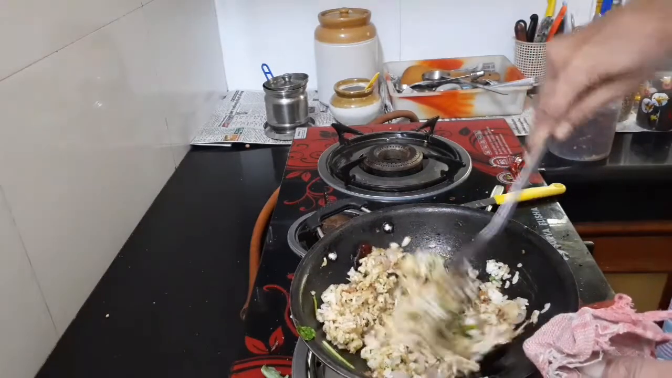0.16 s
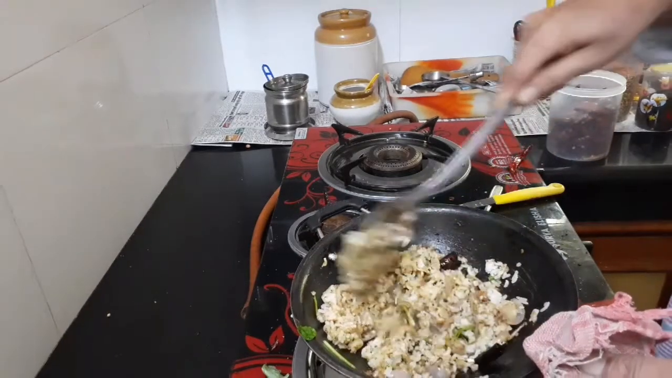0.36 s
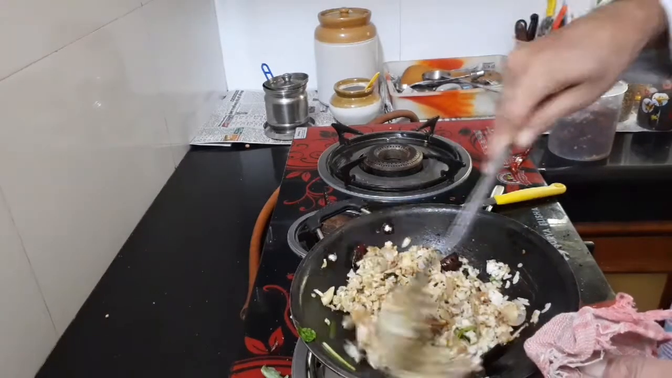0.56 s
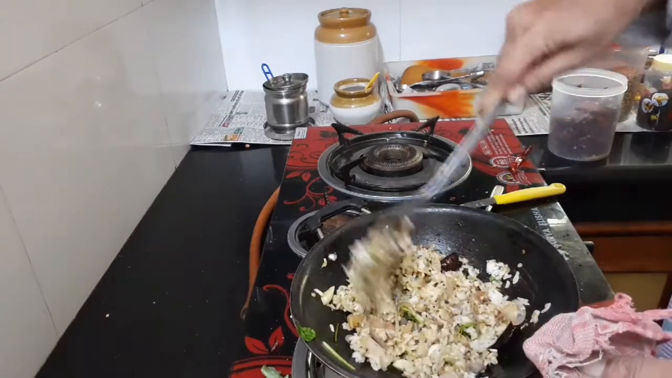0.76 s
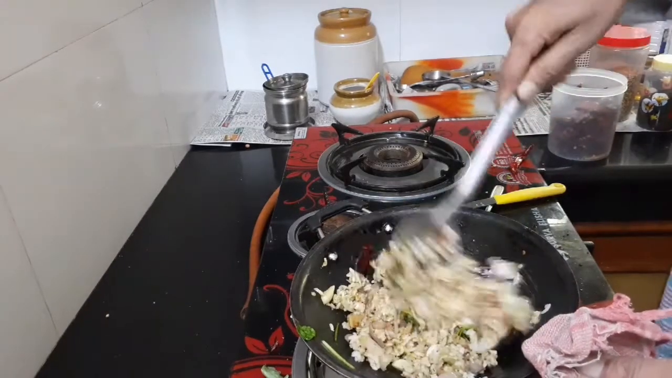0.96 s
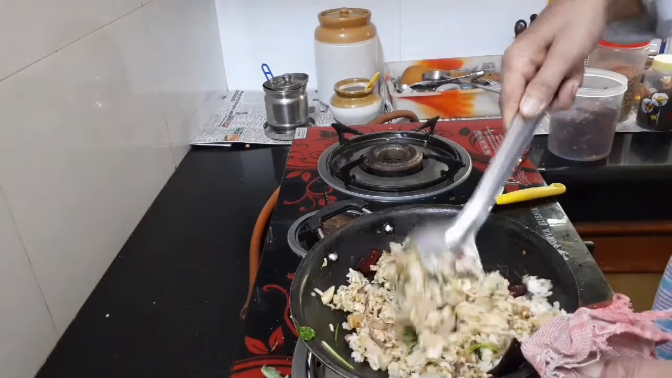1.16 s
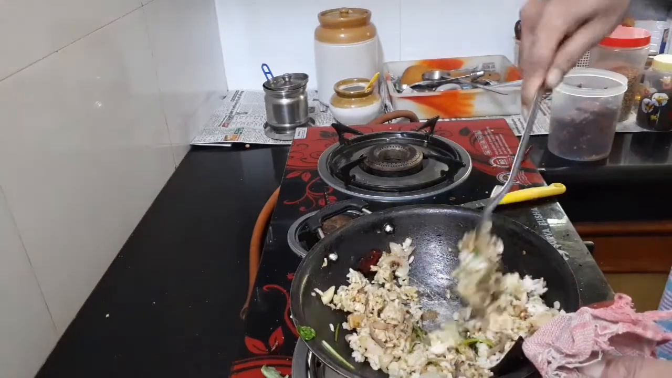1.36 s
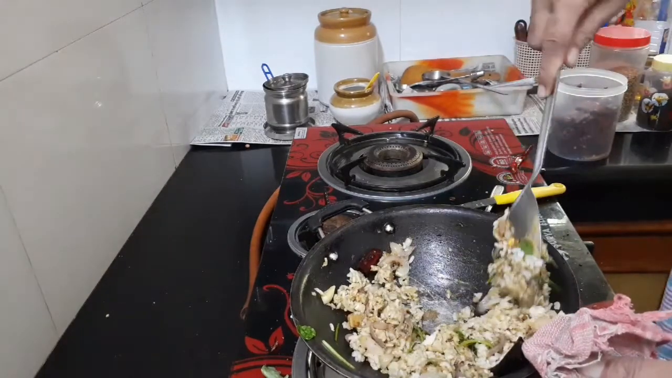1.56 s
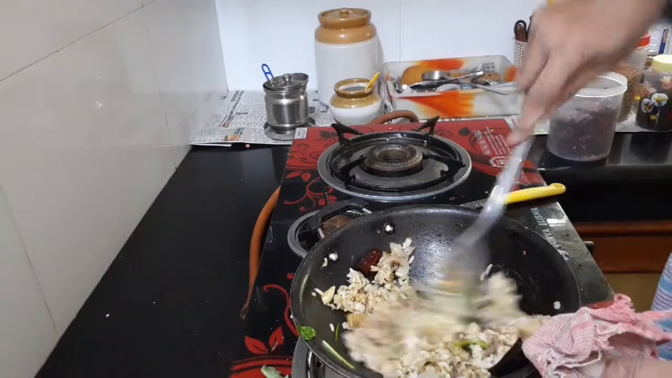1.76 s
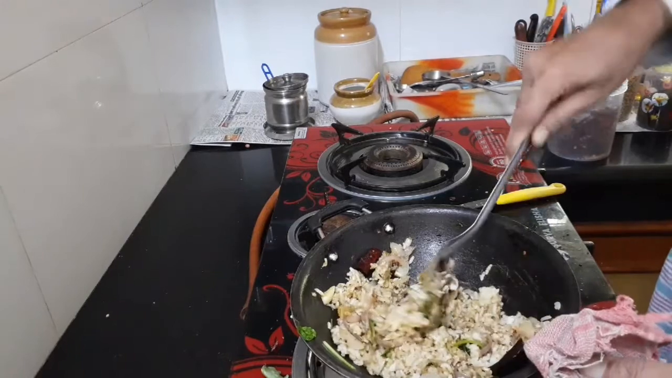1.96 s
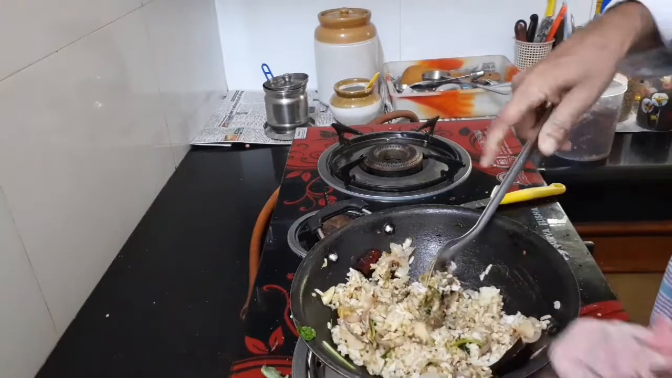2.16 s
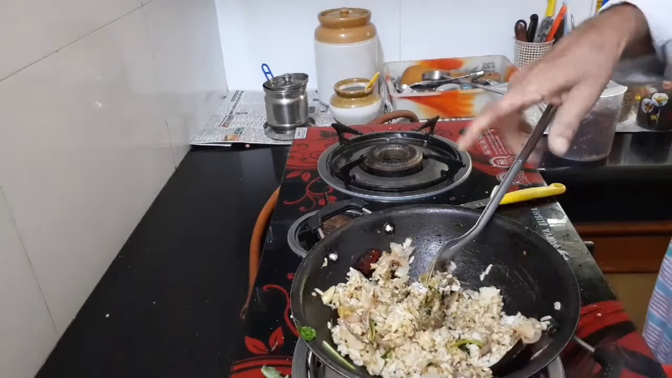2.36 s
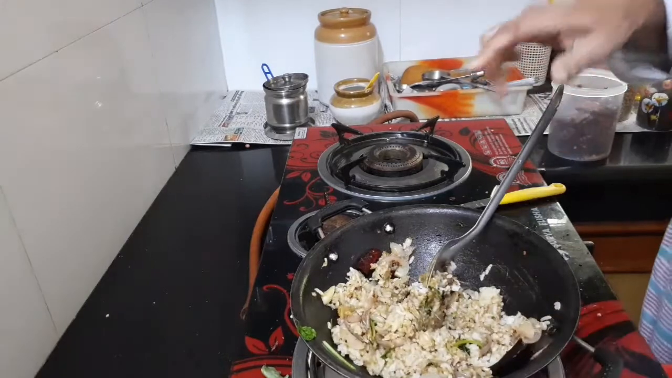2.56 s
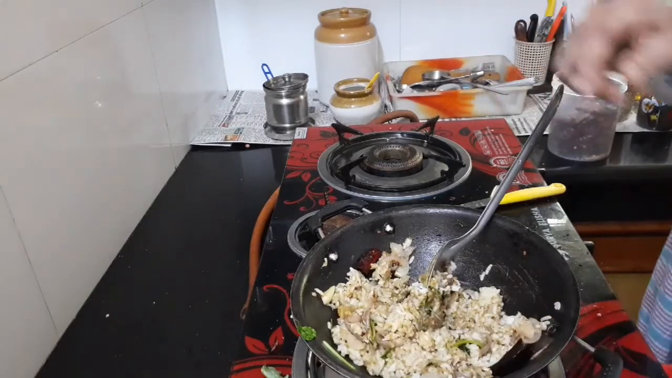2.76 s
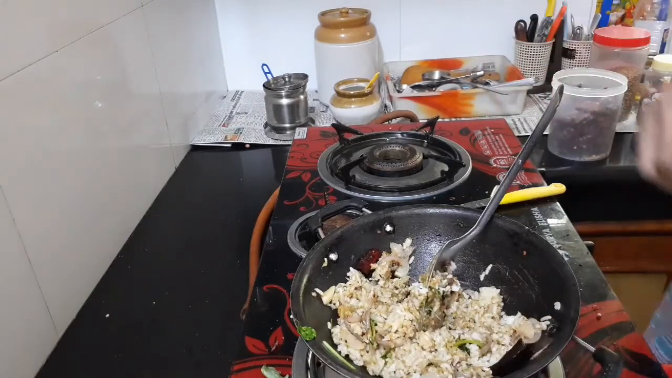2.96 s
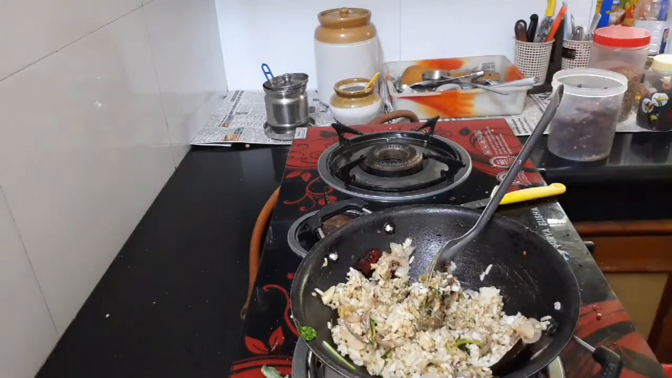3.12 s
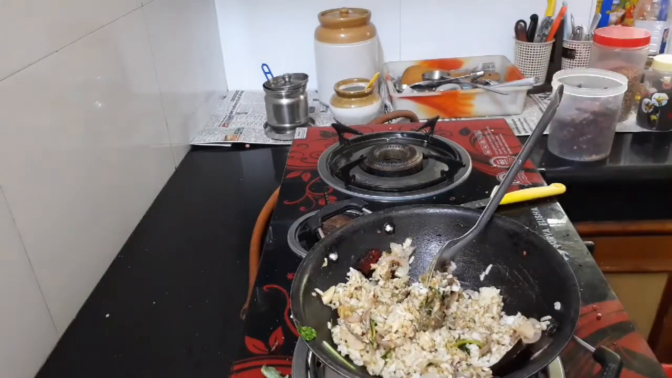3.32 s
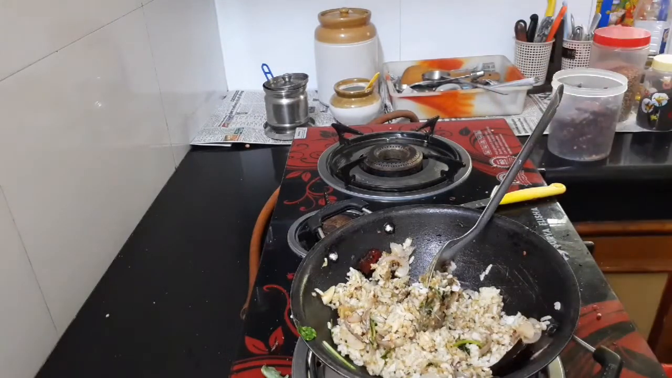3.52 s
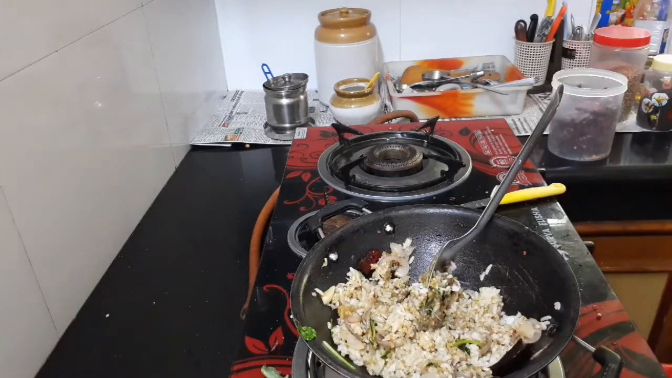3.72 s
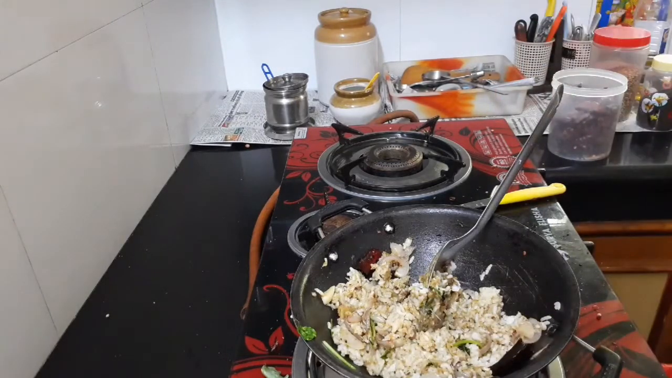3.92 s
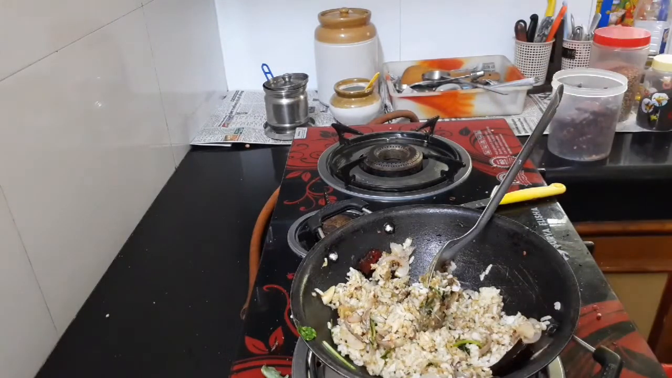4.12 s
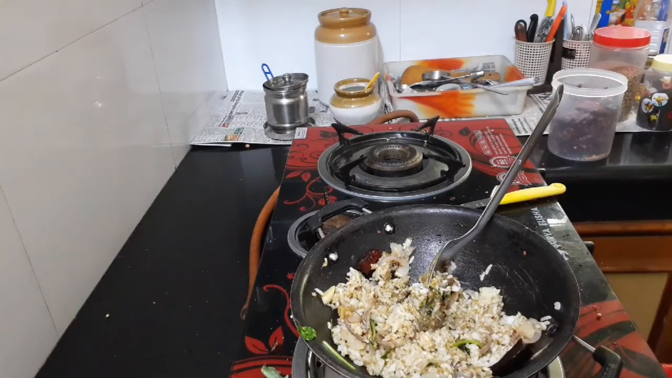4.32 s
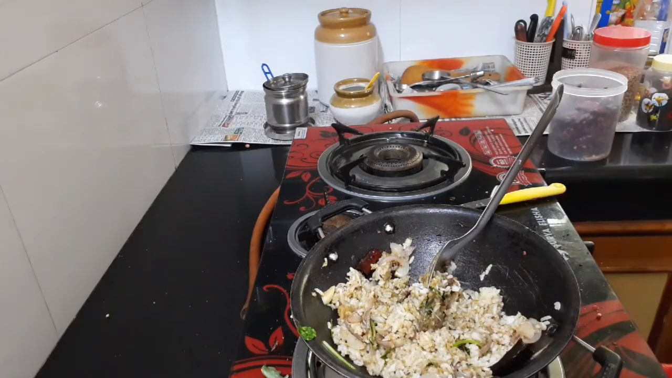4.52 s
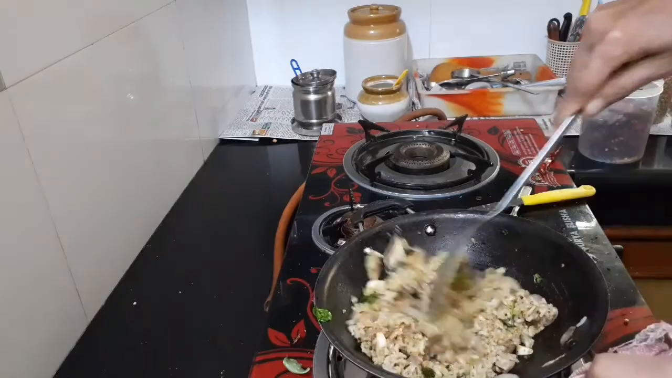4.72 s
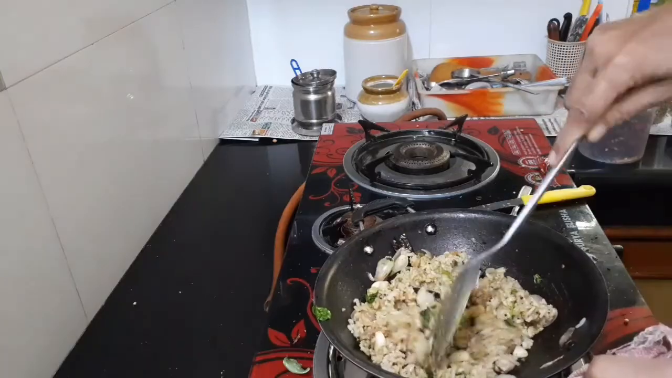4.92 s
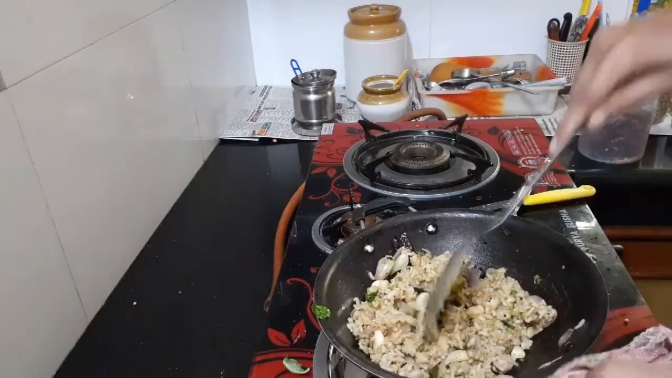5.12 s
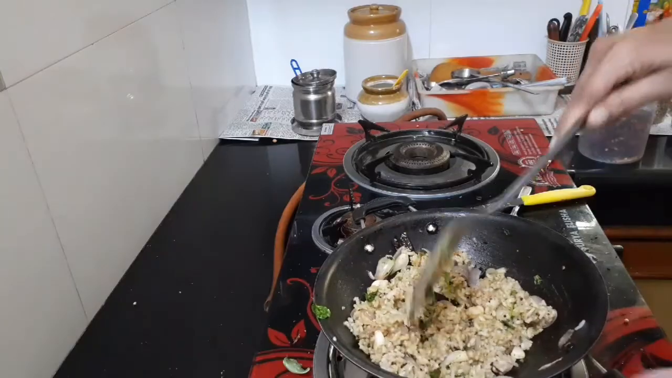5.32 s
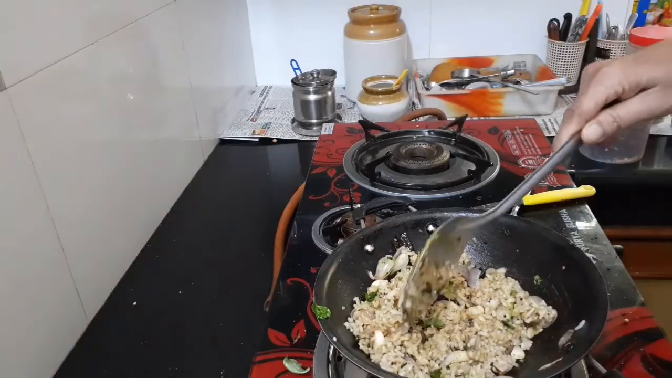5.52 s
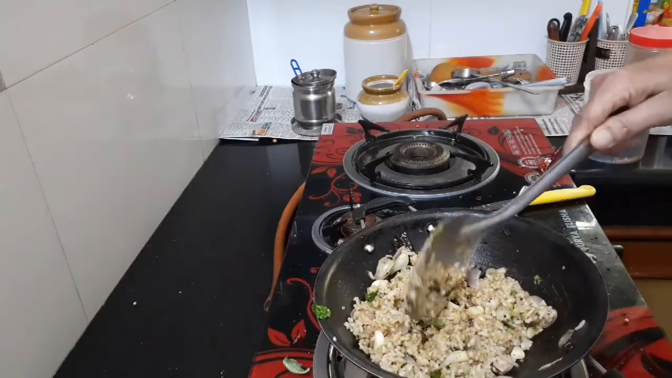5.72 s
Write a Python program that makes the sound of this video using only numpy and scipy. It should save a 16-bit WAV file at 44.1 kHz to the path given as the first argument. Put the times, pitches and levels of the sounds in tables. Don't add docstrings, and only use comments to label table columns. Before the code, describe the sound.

A nearby stereo microphone pair hears rice being fried in a home kitchen. From the start, fine sizzle and soft low rumble of air and burner sit under a faint steady fan hum. At about 0.55 to 0.7 seconds a metal ladle scrapes brightly and knocks the pan, with a thin squeal. Around 0.9 it taps again, and near 1.1 a short low groan rubs out of the pan. From 1.6 to 2.3 come quick clanks, scrapes, grainy rustles and dull thuds. The ladle then rests; the sizzle livens, with scattered sharp pops and ticks. From 3.6 everything fades steadily, reaching silence near 4.7. Stirring cuts back in abruptly, and at about 4.98 the ladle strikes bare metal with a loud, bright, short-ringing clang. Further knocks and scrapes follow at 5.1, 5.2 and 5.35, leaving sizzle, a few pops and low rumble until the end near 5.9.

```python
import sys
import numpy as np
from scipy import signal
from scipy.fft import rfft, irfft
from scipy.io import wavfile
from scipy.ndimage import uniform_filter1d

SR = 44100
rng = np.random.default_rng(int(sys.argv[2]) if len(sys.argv) > 2 else 0)


def natural_amplitude(level_db):
    exponent = np.asarray(level_db, float) / 20
    return 10 ** exponent


def log_audio(samples):
    frames = np.atleast_2d(samples).T
    limited = np.clip(frames, -1, 1)
    pcm = np.round(limited * 32767).astype(np.int16)
    wavfile.write(sys.argv[1], SR, pcm)


N = 259308

# (peak time [s], level [dB], build-up [s], let-go [s])
SHOVES = [(.016, -45.5, 0.11, 0.074), (.575, -35, 0.0062, 0.082), (.61, -37.5, 0.021, 0.21),
          (.7, -39.5, 0.19, 0.17), (.905, -36, 0.009, 0.061), (.94, -48, 0.063, 0.092),
          (1.09, -45, 0.18, 0.032), (1.19, -42.5, 0.19, 0.16), (1.55, -44.5, 0.1, 0.045),
          (1.59, -39, 0.0077, 0.39), (1.725, -41.5, 0.012, 0.12), (1.764, -36.5, 0.005, 0.22),
          (1.85, -42.5, 0.13, 0.065), (1.965, -37, 0.015, 0.072), (1.985, -40, 0.054, 0.31),
          (2.08, -41.5, 0.0053, 0.2), (2.172, -42, 0.0089, 0.15), (2.21, -37, 0.092, 0.051),
          (2.245, -50, 0.053, 0.02), (.84, -41, .006, 0.37), (1.166, -48, .01, .1),
          (1.36, -52, 0.035, 0.17), (2.293, -38, 0.0068, 0.23), (4.702, -39.5, 0.04, 0.18),
          (4.944, -39, 0.0089, 0.14), (5.07, -32.5, 0.11, 0.054), (5.154, -37.5, 0.067, 0.031),
          (5.22, -48, .1, 0.34), (5.358, -36.5, 0.027, 0.23)]
# (peak time [s], rice rustle [dB], steel scrape [dB], build-up [s], let-go [s])
SWEEPS = [(.2, -51, -49, 0.19, 0.26), (.554, -45, -37, .005, 0.4), (.603, -39, -27, 0.063, 0.079),
          (.627, -44, -36.5, 0.065, 0.087), (.7, -51, -55, 0.19, 0.14), (.9, -63, -69, .25, 0.079),
          (.97, -44.5, -47, 0.18, 0.092), (1.09, -50.5, -47.5, 0.53, 0.25), (1.59, -52, -56, 0.019, 0.19),
          (1.75, -61.5, -53.5, 1, .1), (1.764, -46, -38.5, 0.002, 0.18), (1.783, -39, -34.5, 0.026, 0.11),
          (1.8, -46, -41.5, 0.074, 0.27), (2., -57.5, -52, 0.14, 0.62), (2.085, -61, -65, .015, .08),
          (2.18, -53, -53, 0.027, 0.18), (4.708, -48, -46.5, 0.024, 0.22), (4.75, -49.5, -47, 0.079, 0.26),
          (4.96, -48.5, -43, 0.034, 0.013), (5.12, -57, -76, 0.19, 1), (5.2, -45, -45, 0.051, 0.08),
          (5.356, -58, -48, 0.016, .02), (5.45, -61, -59, 1, .4), (5.8, -55.5, -59, 1, 0.34)]
SPAN_DB = 27.5
STEEL_QUICKER = 1.2
DRAG_DB, DRAG_PUSH_DB = -62, -75.5
LAID_DOWN_S, FADE_FROM_S, CUT_S, CLANG_S = 2.52, 3.6, 4.702, 4.9765

# (frequency [Hz], level [dB], t60 [s])
PAN = [(286.3, -7, 0.12), (352, -3, 0.2), (420, 5.5, 0.19), (489.4, -6, 0.19), (514.4, 2.5, 0.1),
       (598, 2, 0.13), (643.6, 1.5, 0.14), (687, 1, 0.041), (842, -5, 0.11), (982, -8.5, 0.4),
       (1093, -5.5, 0.075), (1400, -28, 0.027), (1300, -23, 0.041), (1603, -17, 0.069)]
# (frequency [Hz], level [dB])
LADLE_MODES = [(5055, -55.5), (5496, -56), (5814, -53.5), (6228, -65.5), (6616, -60.5), (6971, -59.5),
               (7203, -55.5), (8597, -44), (9179, -42), (10336, -49.5), (10465, -53), (11434, -49),
               (11838, -56.5), (12726, -45.5)]
LADLE_T60_S = 0.1
# (frequency [Hz], density [dB per Hz])
THUD_SPECTRUM = [(35, -33), (60, -20.5), (237, -12), (449, -15.5), (488, 4), (810, -4.5), (923, -12.5),
                 (1000, -12), (1300, -17), (3000, -23.5), (3900, -49), (6600, -120)]
# (frequency [Hz], density [dB per Hz])
RUSTLE_SPECTRUM = [(590, -32), (1000, -2.5), (1170, -7.5), (1310, -3.5), (2310, 5.5), (3000, -0.5),
                   (3560, 2.5), (7000, -12.5), (9100, -63), (15400, -120)]
# (frequency [Hz], density [dB per Hz])
SCRAPE_SPECTRUM = [(2350, -31.5), (4000, -22.5), (4790, -5.5), (5500, -13), (5700, -7), (7880, -8.5),
                   (8910, -1), (12000, -7.5), (12900, -9), (16000, -13.5)]

# (time [s], peak [dB], treble hardness [dB], tilt of the pan modes [dB per octave])
KNOCKS = [(0.018, -66, -41.5, -19), (0.566, -41, 9, -1), (0.601, -27.5, 2, 10.5), (0.679, -36, -19, 8),
          (0.842, -47, -12, 7), (0.905, -36.5, 0, 6), (1.043, -38.5, -12, -28), (1.163, -49, -15, 6),
          (1.587, -31, 1, 5), (1.72, -35, -1, -7), (1.769, -27, 5.5, 12), (1.85, -32, -21, 6),
          (1.963, -34.5, -27, -2), (1.989, -29, -33, -12), (2.082, -36, -9, 8), (2.17, -33, 7, 3.5),
          (2.195, -35, -20, -9), (2.296, -33, -31, -7), (4.937, -53, 9, 7), (5.101, -27, -29, 16),
          (5.353, -31, -17, 4.5)]
# (frequency [Hz], level [dB], t60 [s])
BARE_PAN = [(417.5, -7.5, 0.39), (492, 0.5, 0.47), (534, -22, 0.22), (600, 2, 0.12), (695, -2, 0.37),
            (810, -25, 0.14), (810, -23, .2), (1014, -4, 0.29), (1098, -10, .2), (1204, -7, 0.48),
            (1350, 6.5, 0.12), (1417, -15, 0.71), (1460, 2, 0.13), (1704, -5, 0.12), (1840, -11, 0.25),
            (1977, -3.5, 0.16), (2220, -3.5, 0.15), (2650, -23, 0.14), (2560, -23, 0.28), (2780, -26, 0.11),
            (3180, -23, 0.26), (3450, -9, 0.22)]
# (frequency [Hz], density [dB per Hz])
CRACK_SPECTRUM = [(40, -68), (240, -19.5), (400, -16.5), (504, -4), (893, -10), (979, -2.5), (1220, -11.5),
                  (1460, -10.5), (3470, -25.5), (4650, -33.5), (9040, -27.5), (16000, -48.5)]
# (time [s], peak [dB], frequency [Hz], t60 [s])
TICKS = [(.0195, -52, 1100, .03), (.5607, -38, 2200, .02), (.7175, -34, 4000, .008),
         (.8421, -44, 1500, .02), (.9049, -41, 1300, .02), (.978, -46, 1950, .02), (1.1638, -43, 1600, .02),
         (1.3514, -51, 2100, .04), (1.5874, -38, 2400, .035), (1.72, -42, 1400, .02),
         (1.7706, -29, 2000, .02), (1.7903, -30, 2300, .015), (1.804, -38, 2500, .015),
         (1.81, -36, 1000, .015), (1.979, -50, 1500, .02), (2.0832, -44, 1100, .04),
         (2.104, -45, 1100, .02), (2.116, -43, 800, .02), (2.172, -45, 2500, .03), (2.2, -47, 1700, .015),
         (2.297, -50, 1300, .03), (4.7148, -42, 3200, .015), (4.986, -29, 3500, .015),
         (4.991, -27, 2900, .015), (5.004, -31, 1500, .02), (5.046, -33, 1400, .03),
         (5.1935, -40, 1750, .008), (5.203, -37, 2600, .02), (5.3535, -41, 2000, .015),
         (5.359, -45, 2400, .015), (.019, -40, 650, .03), (.5585, -39, 8500, .03), (.5585, -41, 4500, .02),
         (.8425, -39, 700, .03), (.905, -31, 750, .02), (1.1638, -38, 700, .03), (1.5872, -29, 750, .02),
         (1.72, -35, 600, .03), (1.964, -37, 650, .035), (2.0828, -37, 750, .03), (2.171, -35, 700, .03),
         (2.296, -41, 650, .04), (4.9762, -20, 900, .008), (4.9765, -19, 2200, .006),
         (1.972, -33, 650, .04), (1.65, -36, 450, .03), (1.849, -35, 610, .03), (5.1932, -29, 3500, .008),
         (5.353, -36, 600, .03), (3.374, -46, 3500, .05), (1.598, -42, 2500, .025)]
TICK_SKIRT_DB = -13
TICK_WIDTH = 1.66

# (time [s], level [dB], frequency [Hz], free length [s])
LADLE_RINGS = [(.559, -41, 3450, .008), (.564, -41, 7200, .012), (.58, -34, 8610, .016),
               (.596, -38, 12730, .018), (.573, -38.5, 5820, .022), (.61, -38, 5820, .025),
               (.603, -36.5, 10340, .035), (.654, -39.5, 10340, .028), (.612, -38, 8830, .025),
               (.68, -49, 8830, .05), (1.776, -42, 3700, .023), (1.785, -33, 8833, .024),
               (1.795, -41, 9700, .02), (1.788, -42, 4900, .012), (1.835, -45, 9100, .02),
               (.62, -37, 9180, .015), (.607, -38, 11430, .02), (.58, -42, 5060, .015),
               (5.203, -50, 3400, .015), (4.99, -43, 3450, .07), (4.985, -39, 2870, .035)]
# (time [s], level [dB], frequency [Hz], free length [s])
PAN_RINGS = [(.602, -35, 1445, .03), (.606, -35, 2340, .03), (.63, -40, 2326, .03), (.68, -47, 1450, .025),
             (.602, -38, 1050, .03), (.69, -43, 900, .03), (1.589, -46, 2300, .015), (1.77, -31, 1990, .02),
             (1.772, -34, 2250, .025), (1.776, -39, 2520, .02), (1.78, -37, 2120, .02),
             (1.787, -37, 2390, .015), (1.79, -38, 1520, .012), (1.801, -32, 1507, .02),
             (1.866, -41, 1500, .02), (1.9, -51, 1540, .015), (1.935, -53, 1500, .03), (.6, -50, 150, .04),
             (1.6, -55, 110, .04), (1.975, -54, 140, .04), (1.17, -57, 160, .04), (4.985, -28, 991, .065),
             (4.99, -29, 495, .09), (5.03, -37, 1400, .03), (4.995, -37, 1507, .02),
             (1.868, -49, 1750, .03), (2.196, -45, 1680, .01), (4.02, -65, 2580, .18),
             (4.71, -46, 110, .055), (4.936, -39, 620, .012), (4.98, -44, 125, .045), (5.1, -37, 596, .1),
             (1.08, -48, 1150, .055), (5.104, -33, 1133, .036), (5.2, -46, 1140, .025),
             (1.2, -48, 1050, .04)]
# (time [s], level [dB], frequency [Hz], free length [s])
BOWED_MODES = [
    (1.062, -26.5, 612, .028),
    (1.094, -32, 598, .022),
    (1.126, -33, 590, .02),
    (.662, -39.5, 2326, .12),
    (1.535, -48, 650, .04),
]
SWELL_SHARE, BOW_SHARE = .09, .45
RING_LENGTHS = 6.
WANDER_RAD, WAVER_DB = .2, 1.8
RING_APART_RAD, RING_APART_DB = 0.44, 1.5

# (time [s], peak [dB], frequency [Hz], treble [dB])
POPS = [(1.278, -38, 9500, -6.5), (2.5487, -34.5, 11700, -11), (2.7678, -38.5, 4250, -29),
        (2.871, -39, 3180, -9), (3.03, -37, 9260, -10), (3.07, -40.5, 3350, -20),
        (3.2322, -40.5, 3570, -20), (3.258, -35.5, 2495, -7), (3.368, -38, 4600, -28.5),
        (3.375, -41, 3350, -16), (3.379, -43.5, 3900, -22), (3.383, -49, 3300, -20),
        (3.4552, -38, 8000, -4), (3.63, -42, 2200, -20), (3.634, -47, 2600, -20), (3.537, -51, 9000, -8),
        (3.17, -49, 9000, -8), (3.688, -45, 1810, -14.5), (3.895, -36.5, 12500, -7.5),
        (4.181, -36, 8800, -5), (4.411, -42, 1800, -25), (5.1935, -29.5, 3600, -30),
        (5.338, -45, 4000, -18), (5.583, -41.5, 2330, -17), (5.7077, -36, 9250, -12),
        (5.785, -43, 2530, -19), (3.015, -42, 5020, -8), (3.0282, -44, 2200, -15), (3.115, -44.5, 12000, 4),
        (3.2332, -37, 11000, -11), (3.312, -39.5, 4000, -4), (3.3672, -44.5, 10000, -10),
        (3.4558, -40.5, 4000, -8), (3.55, -64, 4000, -15), (5.771, -50, 4230, -14), (5.421, -42, 4500, -6)]
POP_SCATTER_DB = 2.5
# (frequency [Hz], density [dB per Hz])
FRY_SPECTRUM = [(590, -34), (1000, -8.5), (1230, -10.5), (2080, -1.5), (2940, -3), (4070, 0.5),
                (7530, -8.5), (9170, 1.5), (12300, -4), (15100, -8), (16000, -31)]
FRY_DB = -56
# (time [s], level [dB])
HEAT = [
    (0, 0),
    (1.55, -4.5),
    (2.2, -0.5),
    (2.75, 4),
    (3., 1.5),
    (3.8, 0),
    (4., 0),
    (4.7, 0.5),
    (5.88, -1),
]

# (time [s], level [dB])
RUMBLE_LEVEL = [
    (0, 9),
    (.45, -4),
    (1.3, 8.5),
    (1.55, -2),
    (2.2, 4),
    (2.6, 2.5),
    (3.9, 1.5),
    (4.2, -2),
    (4.9, 6),
    (5.88, 6),
]
# (frequency [Hz], density [dB per Hz])
AIR_SPECTRUM = [(15, -66), (25, -31.5), (102, -3), (209, -10.5), (300, 1), (476, -4), (510, -5),
                (555, -8.5), (730, -7), (838, -8.5), (1500, -47), (1950, -50), (3300, -120)]
AIR_DB = -59.5
# (frequency [Hz], rms level [dB])
FAN_TONES = [(150.7, -76), (306.8, -80.5), (393.0, -69.5), (516.8, -60.5), (748.3, -72.5)]
FAN_FOLLOWS = 0.53

# (frequency [Hz], correlation [0 to 1])
SAME = [(40, 0.98), (100, 0.93), (250, 0.46), (500, 0.95), (1000, 0.063), (2500, 0.54), (6000, 0.24),
        (15000, 0.2)]
# (frequency [Hz], lead [rad])
LEAD = [(100, .1), (600, 0.52), (1300, 1.56), (2500, 0.99), (16000, 1.9)]
# (frequency [Hz], level [dB])
LEAN = [(60, 7.5), (250, 1), (500, 0.5), (1000, 2), (4000, -0.5), (12000, 3)]


def stirring():
    def pan_floor():
        return natural_amplitude(-4.0) * modes(PAN, 6.0) + natural_amplitude(-5.5) * burst(THUD_SPECTRUM, 0.02, -14.0, 0.32, size=8192)

    def grains():
        return burst(RUSTLE_SPECTRUM, 0.0025, -24.5, 0.047, size=4096)

    def ladle_edge():
        ladle = modes([(*mode, LADLE_T60_S) for mode in LADLE_MODES], 2.6)[:, :4096]
        return natural_amplitude(-7.5) * ladle + natural_amplitude(-1.0) * burst(SCRAPE_SPECTRUM, 0.02, -17.5, 0.099, size=4096)

    rice_rows = np.delete(SWEEPS, [2], axis=1)
    steel_rows = np.delete(SWEEPS, [1], axis=1)
    push = rub(stroke(SHOVES, DRAG_PUSH_DB), 260, 3.9, pan_floor, count=3)
    rustle = rub(stroke(rice_rows, -95.5), 2500, 0.87, grains, count=4)
    edge = rub(stroke(steel_rows, DRAG_DB, STEEL_QUICKER), 1800, 2.3, ladle_edge, count=4)
    return push + rustle + edge


def knocks():
    out = np.zeros((2, N))
    for s, db, hard_db, tilt_db in KNOCKS:
        add(out, s, natural_amplitude(db + 20) * modes(PAN, 2.0, np.clip(tilt_db, -7, 6)))
        add(out, s, natural_amplitude(db + 9.0) * burst(THUD_SPECTRUM, 0.0092, -2.5, 0.24, size=4096))
        crack = burst(RUSTLE_SPECTRUM, 0.0035, -1, 0.068, size=4096)
        add(out, s, natural_amplitude(db + min(hard_db, 1) + 3.0) * crack)
    return out


def clang():
    out = np.zeros((2, N))
    add(out, CLANG_S, natural_amplitude(1.0) * burst(CRACK_SPECTRUM, 0.0048, -36, .02, size=2048))
    add(out, CLANG_S, natural_amplitude(6.0) * modes(BARE_PAN, 0.58))
    add(out, CLANG_S, natural_amplitude(8.5) * burst(CRACK_SPECTRUM, 0.033, -0.83, 0.66))
    add(out, CLANG_S, natural_amplitude(-6.0) * burst(RUSTLE_SPECTRUM, 0.034, -6, 0.27))
    add(out, CLANG_S, natural_amplitude(-2.5) * burst(SCRAPE_SPECTRUM, 0.009, -7, 0.09, size=8192))
    return out


def ticks():
    out = np.zeros((2, N))
    far = TICK_WIDTH ** 4
    for s, db, hz, t60 in TICKS:
        colour = [(hz / far, -40), (hz / TICK_WIDTH, TICK_SKIRT_DB), (hz, 0),
                  (hz * TICK_WIDTH, TICK_SKIRT_DB), (hz * far, -52)]
        nick = burst(colour, t60, -20, .08, size=2048)
        add(out, s, natural_amplitude(db + 2.5) * nick / abs(nick).max())
    return out


def rings():
    out, t = np.zeros((2, N)), np.arange(SR // 4) / SR

    def slow_noise():
        noise = rng.standard_normal(len(t))
        return evened(uniform_filter1d(uniform_filter1d(noise, size=200), size=200))

    for rows, share in (LADLE_RINGS + PAN_RINGS, SWELL_SHARE), (BOWED_MODES, BOW_SHARE):
        for s, db, hz, length in rows:
            lag = np.array([[0], [read(LEAD, hz)]])
            phase = 2 * np.pi * hz * t + WANDER_RAD * slow_noise() - lag
            fall_db = 60 * t / (RING_LENGTHS * length) + 60 * np.maximum(t - length, 0) / .07
            swell = 1 - np.exp(-(t / min(share * length, .02)) ** 2)
            add(out, s, natural_amplitude(db - fall_db + WAVER_DB * slow_noise()) * swell * np.sin(phase))
    return out


def pops():
    out, t = np.zeros((2, N)), np.arange(2000) / SR
    for s, db, hz, bright_db in POPS:
        pan_db = POP_SCATTER_DB * rng.standard_normal()
        decay = np.exp(-t / 0.00041) + natural_amplitude(-20.0) * np.exp(-t / 0.027)
        spray = rng.standard_normal((2, len(t))) * decay
        treble_db = min(bright_db, 0)
        colour = [(300, -50), (hz / 2.5, -16), (hz, 0), (hz * 1.6, treble_db + 5.0), (17000, treble_db - 11.0)]
        pop = ports(*spray, colour)
        sides_db = np.array([[pan_db], [-pan_db]]) / 2
        add(out, s, natural_amplitude(db + 3.5 + sides_db) * pop / abs(pop).max())
    return out


def sizzle():
    gusts = natural_amplitude(1.2 * evened(uniform_filter1d(rng.standard_normal(N), 2000)))
    hiss = wash(FRY_SPECTRUM)
    crackle = rub(0.7, 600, 5.1, lambda: burst(FRY_SPECTRUM, 0.0037, -24.5, 0.028, size=2048), count=5)
    return natural_amplitude(FRY_DB) * drift(HEAT) * gusts * (natural_amplitude(-2.0) * hiss + natural_amplitude(-4.5) * crackle)


def room():
    t = np.arange(N) / SR
    out = natural_amplitude(AIR_DB - 5.5) * drift(RUMBLE_LEVEL) * wash(AIR_SPECTRUM)
    for hz, db in FAN_TONES:
        waver = natural_amplitude(1.1 * evened(uniform_filter1d(rng.standard_normal(N), 4000)))
        lag = np.array([[0], [read(LEAD, hz)]])
        tone = np.sin(2 * np.pi * hz * t - lag)
        out = out + natural_amplitude(db - 1.0) * waver * drift(RUMBLE_LEVEL, FAN_FOLLOWS) * tone
    return out


def stroke(rows, drag_db, quicker=0.94):
    t = np.arange(0, N + 64, 32) / SR
    s, db, rise, fall = np.transpose(rows)[..., None]
    lost = np.maximum((s + 0.0084 - t) / rise, quicker * (t - s - .006) / fall)
    held = (t < LAID_DOWN_S) | (t > CUT_S)
    power = (natural_amplitude(db - SPAN_DB * lost) ** 2).sum(0) + held * natural_amplitude(drag_db) ** 2
    return np.interp(np.arange(N) / SR, t, np.sqrt(power))


def slips(per_s, spread_db):
    u = rng.random(N) * SR / per_s
    size = (u + .05) ** (-spread_db / 8.686)
    return evened((u < 1) * size * (-1) ** np.arange(N))


def rub(gain, per_s, spread_db, response, count=5):
    out = np.zeros((2, N))
    for _ in range(count):
        clicks = gain * slips(per_s / count, spread_db)
        out += signal.oaconvolve(clicks[None], response(), axes=1)[:, :N]
    return out / np.sqrt(count)


def modes(table, spot_db, tilt_db=0):
    t = np.arange(8192) / SR
    hz, db, t60 = np.transpose(table)[..., None]
    spot = spot_db * rng.standard_normal(hz.shape)
    weight = natural_amplitude(db + tilt_db * np.log2(hz) + spot) * rng.choice([-1, 1], hz.shape)
    onset = 1 - np.exp(-t * hz / .5)
    wave = weight * onset * np.exp((2j * np.pi * hz - np.log(1000) / t60) * t)
    lag = RING_APART_RAD * rng.standard_normal(hz.shape) - read(LEAD, hz)
    apart = natural_amplitude(RING_APART_DB * rng.standard_normal(hz.shape)) * np.exp(1j * lag)
    end_fade = np.clip(9 - 10 * t / t[-1], 0, 1)
    x = np.array([wave.sum(0), (wave * apart).sum(0)]).imag * end_fade
    return x / np.linalg.norm(x[0])


def burst(spectrum, t60, tail_db, tail_t60, size=16384):
    t = np.arange(size) / SR
    end_fade = np.clip(9 - 10 * t / t[-1], 0, 1)
    decay = (natural_amplitude(-60 * t / t60) + natural_amplitude(tail_db - 60 * t / tail_t60)) * end_fade
    x = ports(*rng.standard_normal((2, size)) * decay, spectrum)
    return x / np.sqrt((x ** 2).sum() / 2)


def wash(spectrum):
    return ports(*rng.standard_normal((2, 2 ** 18)), spectrum)[:, :N]


def ports(left, other, spectrum):
    hz = np.fft.rfftfreq(len(left), 1 / SR)
    same, a = np.clip(read(SAME, hz), -1, 1), rfft(left)
    right = (same * a + np.sqrt(1 - same ** 2) * rfft(other)) * np.exp(-1j * read(LEAD, hz))
    lean = read(LEAN, hz) / 2
    z = np.array([a * natural_amplitude(lean), right * natural_amplitude(-lean)])
    cepstrum = irfft(np.log(natural_amplitude(np.maximum(read(spectrum, hz), -90))), len(left))
    cepstrum[1:len(left) // 2] *= 2
    cepstrum[len(left) // 2 + 1:] = 0
    return evened(irfft(z * np.exp(rfft(cepstrum)), len(left)))


def drift(points, share=0.96):
    return natural_amplitude(share * np.interp(np.arange(N) / SR, *np.transpose(points)))


def read(points, hz):
    f, value = np.transpose(points)
    return np.interp(np.log(hz + 1), np.log(f + 1), value)


def evened(x):
    return x / np.sqrt(np.mean(x ** 2) + 1e-20)


def add(mix, s, sound):
    part = mix[:, round(s * SR):][:, :sound.shape[1]]
    part += sound[:, :part.shape[1]]


def scene():
    return stirring() + knocks() + clang() + ticks() + rings() + pops() + sizzle() + room()


def top_cut(x):
    return signal.sosfilt(signal.butter(12, 15820, fs=SR, output="sos"), x)


def record(dry):
    t = np.arange(N) / SR
    fade_out = np.clip((CUT_S - .005 - t) / (CUT_S - FADE_FROM_S), 0, 1)
    cut_in = np.clip((t - CUT_S) / 0.0011, 0, 1)
    fade = np.where(t < CUT_S, fade_out, cut_in)
    low_pass = signal.firwin(255, 15950, window=("kaiser", 7), fs=SR)
    return top_cut(signal.oaconvolve(dry * fade, low_pass[None], "same"))


dry = scene()
out = record(dry)
log_audio(out)
```